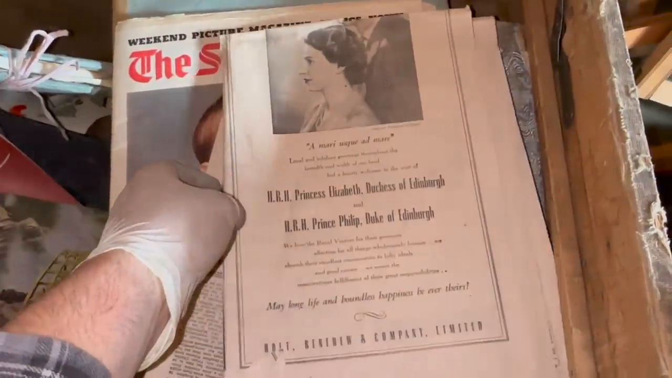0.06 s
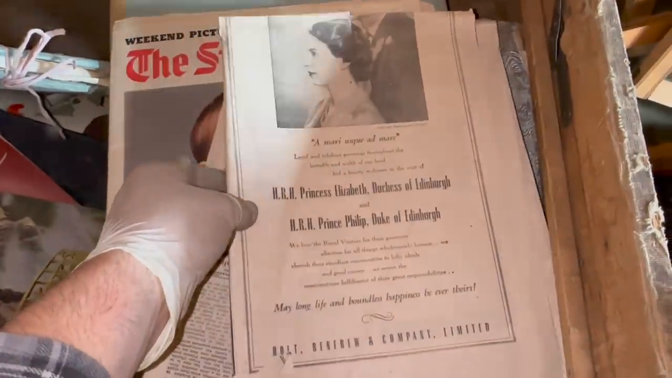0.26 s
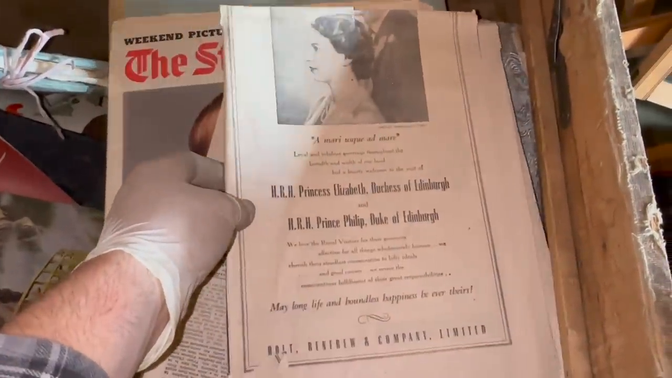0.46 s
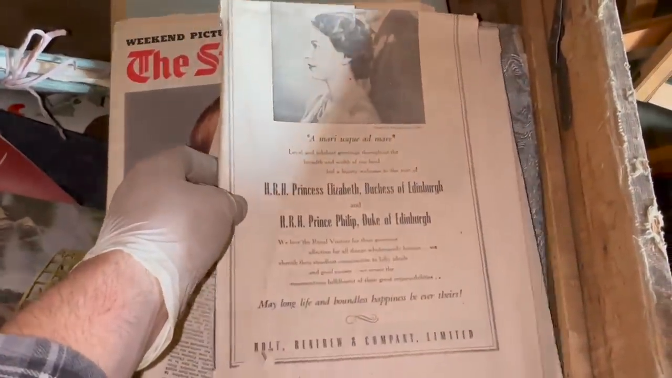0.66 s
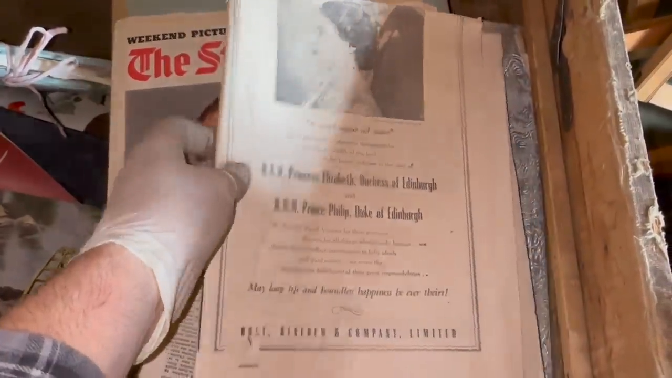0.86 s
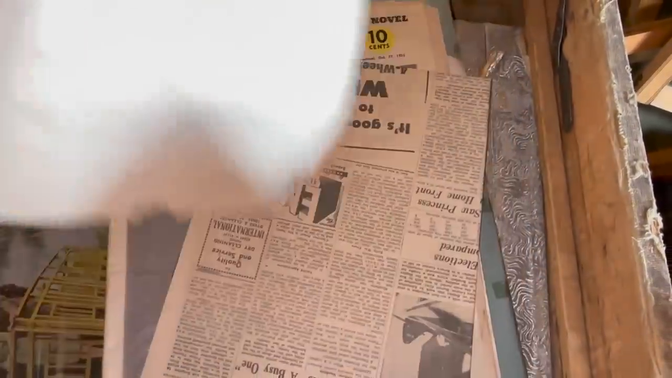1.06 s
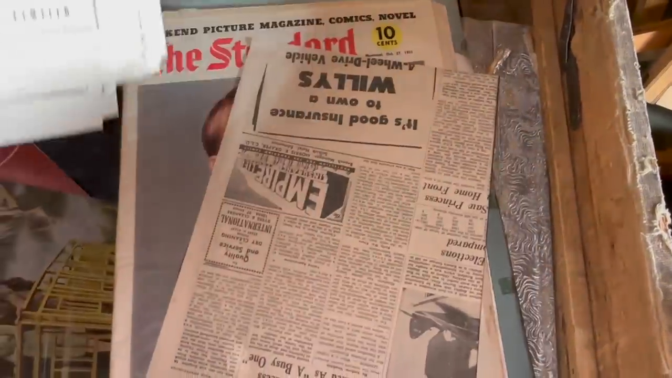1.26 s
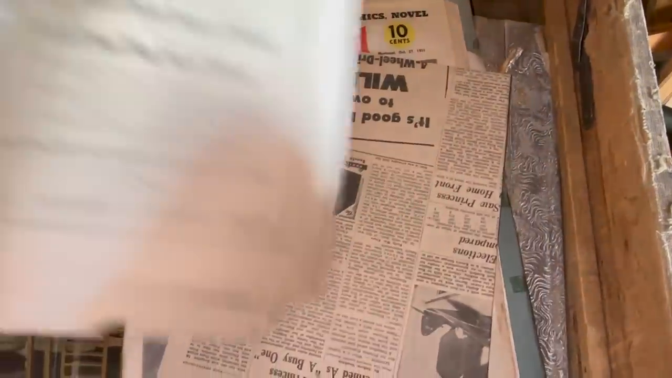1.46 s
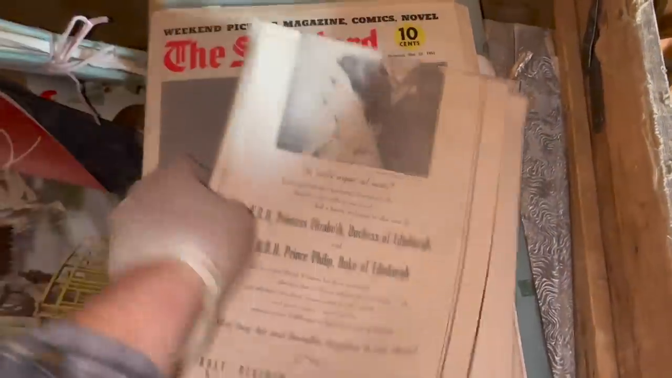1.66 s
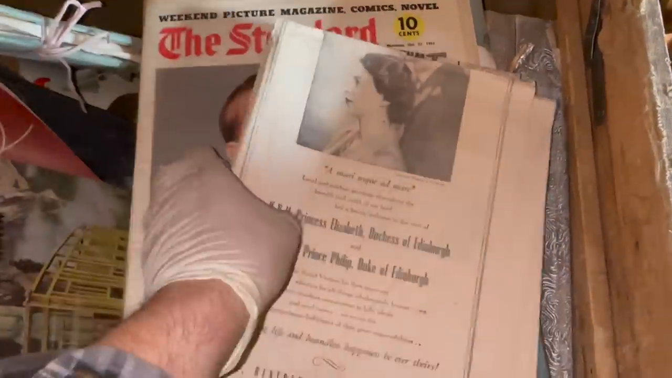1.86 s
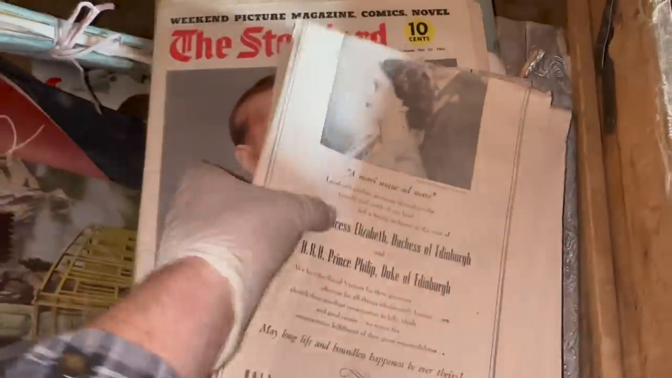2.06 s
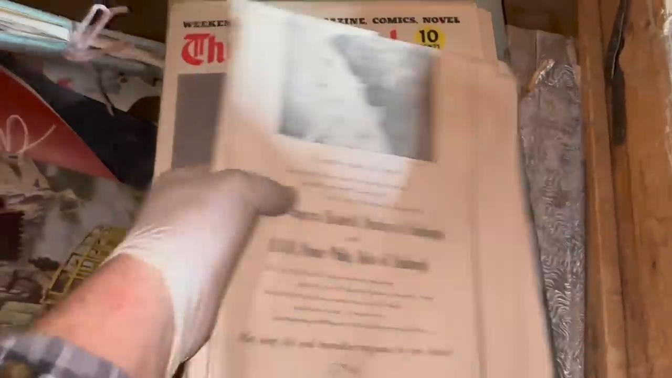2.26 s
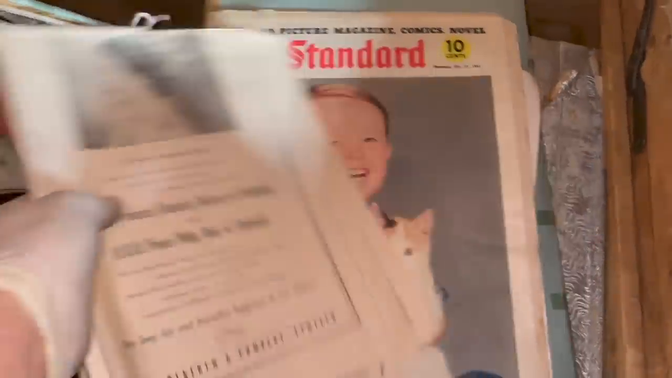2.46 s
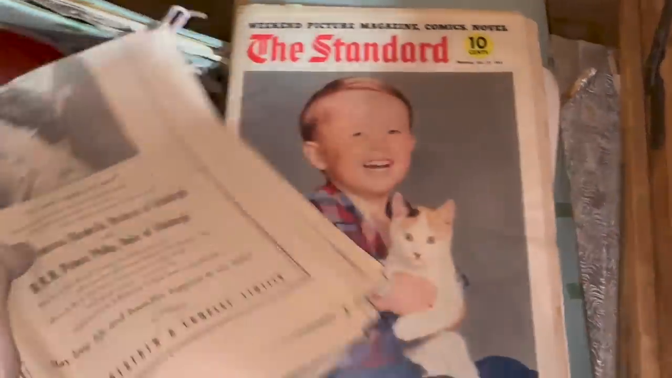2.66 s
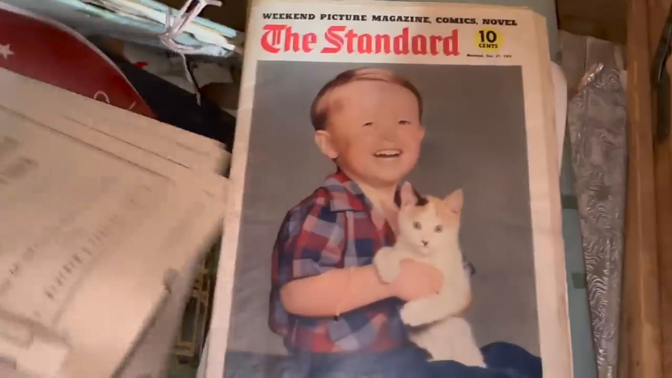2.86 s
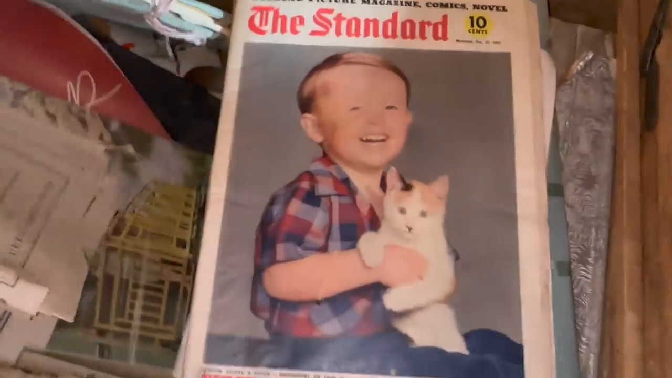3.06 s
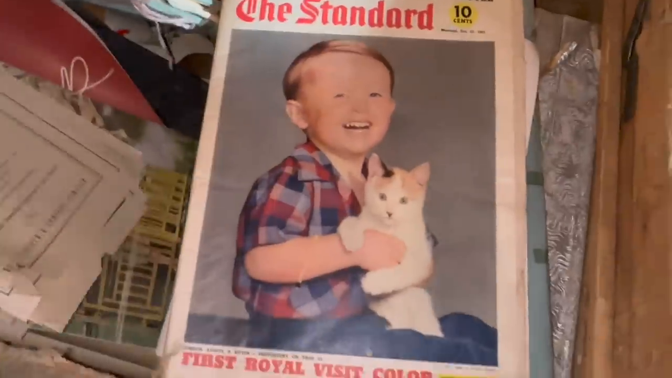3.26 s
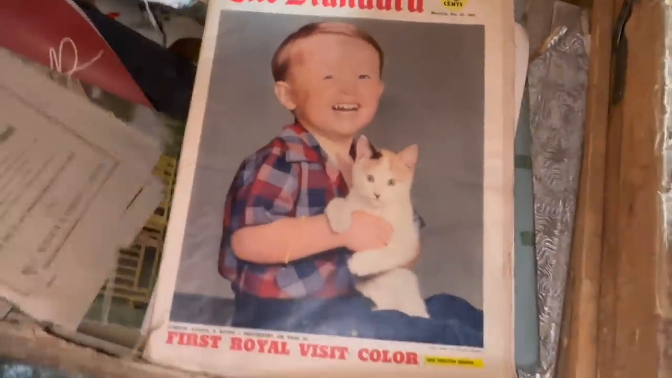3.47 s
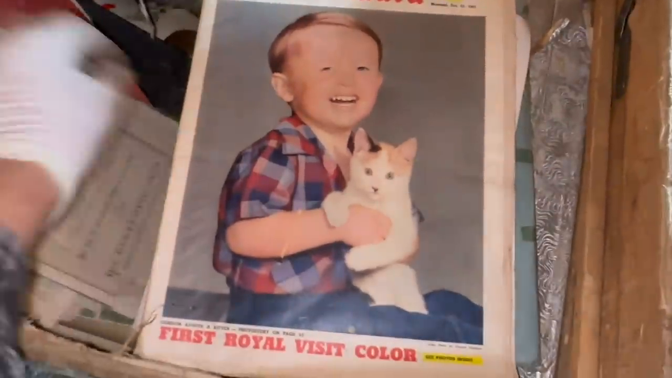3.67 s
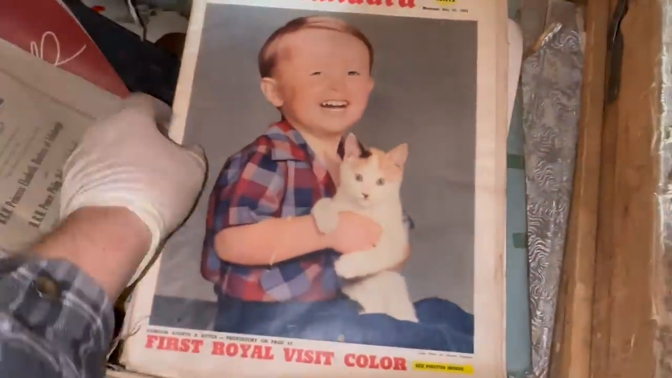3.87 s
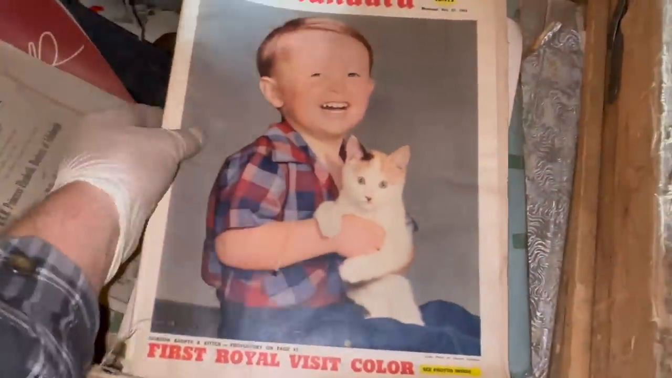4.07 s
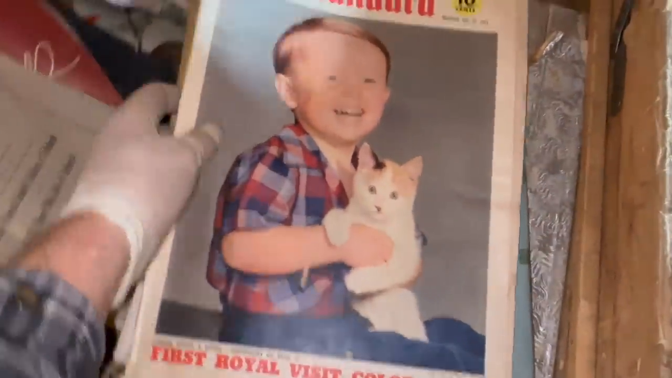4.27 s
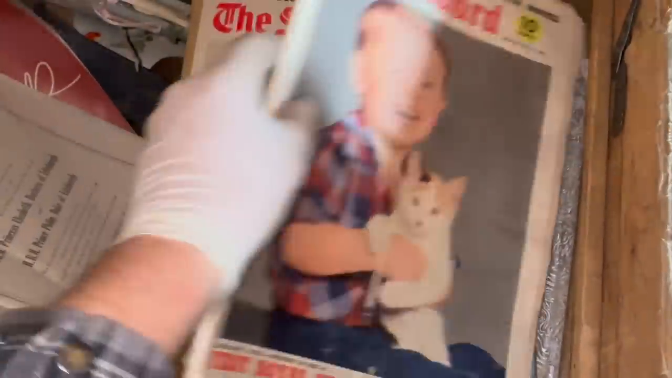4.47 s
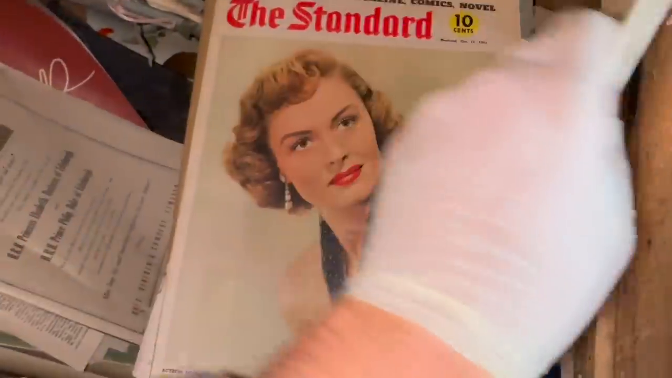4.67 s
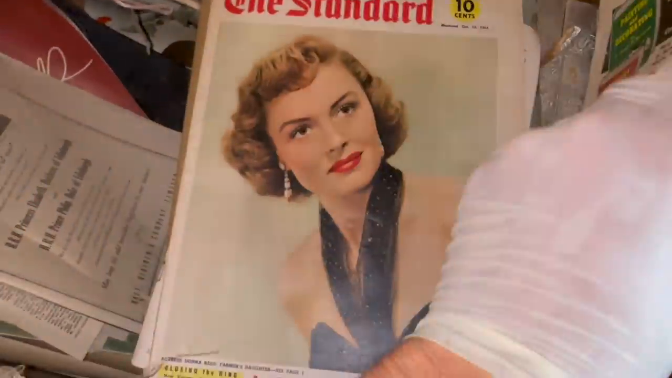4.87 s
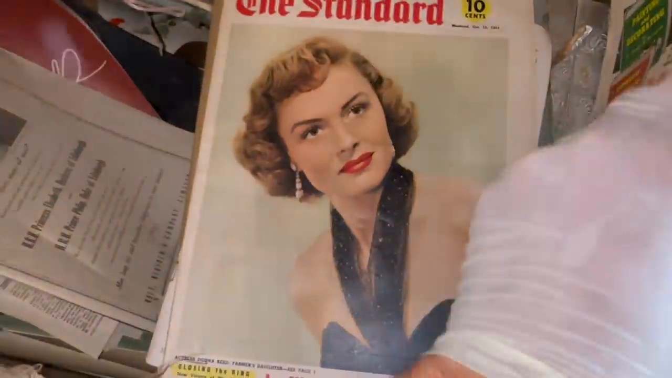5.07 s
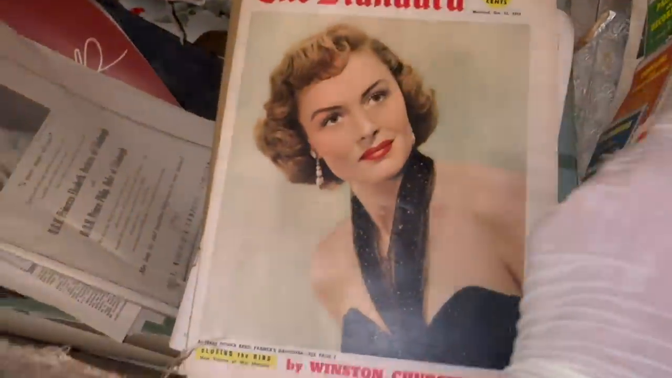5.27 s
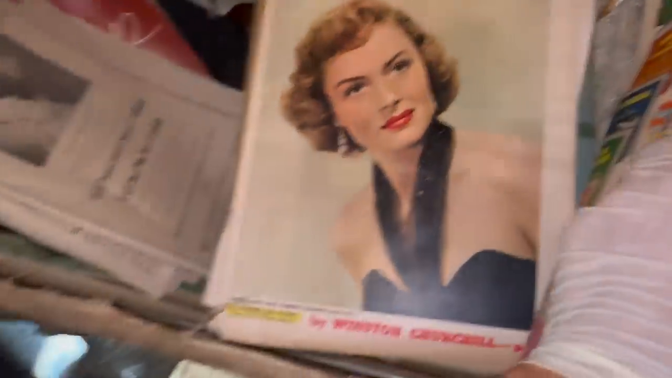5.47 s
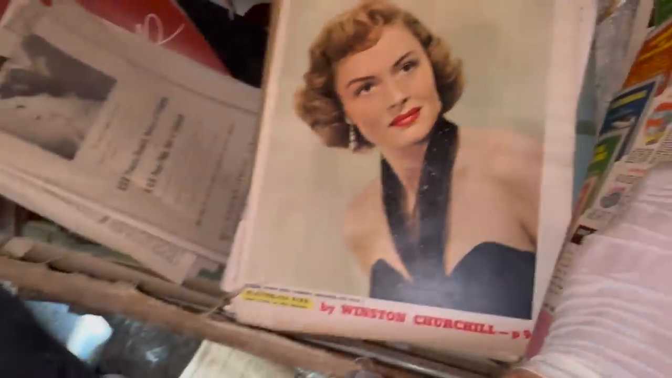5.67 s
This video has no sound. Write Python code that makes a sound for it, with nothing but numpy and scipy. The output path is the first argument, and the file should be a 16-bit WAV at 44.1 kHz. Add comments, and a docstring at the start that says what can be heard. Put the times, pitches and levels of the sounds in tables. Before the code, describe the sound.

A hand shuffles brittle newspaper and magazine pages over a wooden crate, heard very close with short, dry reflections. Sparse light crackles build into crunching folds and a strong papery swoosh, followed by a dull, sinking thump of the dropped pages. After a lull, fine crisp ticks thicken into a rapid crackling page turn with a faint wooden knock, then fade into low room rumble and soft hiss.

```python
"""A low rumble and a faint hiss open the scene in a quiet garage: filtered noise, swelling slowly.
Over them a gloved hand lifts, slides and drops old newspaper and magazine pages above a wooden crate.
Sheets hiss and crinkle (noise and small rings), creases snap and crunch (noise bursts through resonances),
knocks ring the crate (decaying modes), and the dropped stack booms (sines that sink in pitch).
Short echoes follow the buckling, and two microphone ports colour everything."""
import sys
import numpy as np
from scipy import signal
from scipy.fft import rfft, irfft, next_fast_len
from scipy.io import wavfile
from scipy.ndimage import map_coordinates

SR = 44100
rng = np.random.default_rng(int(sys.argv[2]) if len(sys.argv) > 2 else 0)


def persist_wave(psi):
    """Save psi, clipped to +-1, as 16-bit WAV."""
    counts = np.round(np.clip(psi, -1, 1) * 32767).astype(np.int16)
    wavfile.write(sys.argv[1], SR, np.atleast_2d(counts).T)


N = 252340  # samples


def amp(db):
    """Decibels to gain."""
    return 10 ** (np.asarray(db) / 20)


def rms_one(x):
    """Scaled to unit power."""
    return x / np.sqrt(np.mean(x ** 2) + 1e-20)


def in_time(rows):
    """Each column of a curve, sample by sample."""
    s, *columns = np.transpose(rows)
    return [np.interp(np.arange(N) / SR, s, c) for c in columns]


def at_hz(points, hz):
    """A spectrum read on a log-frequency axis."""
    point_hz, values = np.array(points).T
    return np.interp(np.log(hz), np.log(point_hz + 1), values)


def drift(corner_hz):
    """Slow random wander around zero with spread 1: noise through a two-pole lowpass."""
    # computed at every 40th sample, with the start-up of the filter dropped
    r = np.exp(-80 * np.pi * corner_hz / SR)
    noise = rng.standard_normal(N // 40 + 2002)
    slow = signal.lfilter([1], [1, -2 * r, r * r], noise)[2000:]
    return np.interp(np.arange(N) / 40, np.arange(len(slow)), rms_one(slow))


def band(order, edges_hz, x):
    """Bandpass filter."""
    return signal.sosfilt(signal.butter(order, edges_hz, "band", fs=SR, output="sos"), x)


def above(x, hz):
    """Highpass: thin paper radiates little bass."""
    return signal.sosfilt(signal.butter(2, hz, "high", fs=SR, output="sos"), x)


def coloured(x, spectrum):
    """Filtered by a spectrum, then set to unit power."""
    size = next_fast_len(N)
    hz = np.fft.rfftfreq(size, 1 / SR) + 1
    return rms_one(irfft(rfft(x, size) * amp(at_hz(spectrum, hz)), size)[..., :N])


def patchy(x, low_hz, patch_db, corner_hz, count):
    """Octave bands swell and sink independently, so the colour keeps shifting."""
    out = 0
    for k in range(count):
        edges = [low_hz * 2 ** k, min(low_hz * 2 ** (k + 1), .45 * SR)]
        out = out + amp(patch_db * drift(corner_hz)) * band(1, edges, x)
    return out


def ring(x, hz, t60):
    """A mode: a unit click sets a dying sine of starting height 1 ringing."""
    r, w = amp(-60 / (t60 * SR)), 2 * np.pi * hz / SR
    return signal.lfilter([0, np.sin(w)], [1, -2 * r * np.cos(w), r * r], x + 1e-18)


def grains(per_s, spread_db, clump_db, decay_s):
    """Envelope of small releases of uneven size, dying exponentially; a drifting rate can clump them."""
    sizes = amp(spread_db * np.minimum(rng.exponential(1, N), 3))
    starts = sizes * (rng.random(N) < per_s * amp(clump_db * drift(15)) / SR)
    return rms_one(signal.lfilter([1], [1, -np.exp(-1 / (decay_s * SR))], starts))


def wide(spread):
    """Stereo noise: a shared part plus separate left and right parts at 930-8800 Hz and above 14.5 kHz."""
    noise = rng.standard_normal((2, N))
    own = band(4, [930, 8800], noise)
    top = signal.sosfilt(signal.butter(6, 14500, "high", fs=SR, output="sos"), noise)
    return rng.standard_normal(N) + spread * (own * 1.09 + top * 0.48)


# how alike the background is at the two sides: (frequency [Hz], correlation [-1 to 1])
LIKENESS = [(60, 0.97), (180, 0.88), (550, -0.71), (1650, 0.027), (4970, -0.13), (8000, 1), (11000, 1)]


def diffuse(spectrum):
    """Stereo noise from all around: mid and side are mixed to a left-right likeness set by frequency."""
    size = next_fast_len(N)
    alike = np.clip(at_hz(LIKENESS, np.fft.rfftfreq(size, 1 / SR) + 1), -1, 1)
    mid, side = rfft(rng.standard_normal((2, size)))
    pair = np.sqrt(1 + alike) * mid + np.sqrt(1 - alike) * side * [[1], [-1]]
    return coloured(irfft(pair, size)[:, :N], spectrum)


# course of the low rumble: (time [s], level before the swells [dB])
RUMBLE_LEVEL = [(0, -51), (0.07, -43), (0.18, -56), (0.42, -53), (0.51, -51), (0.95, -53.5), (1.2, -47.5),
                (2.28, -51), (2.34, -52.5), (2.75, -47), (2.95, -53), (3.14, -46), (3.5, -44.5),
                (3.63, -55), (3.95, -63.5), (4.23, -66), (4.32, -44.5), (4.5, -58), (4.72, -49.5),
                (5.72, -53.5)]
# spectrum of the rumble: (frequency [Hz], level per Hz [dB, relative])
RUMBLE_COLOUR = [(12, -75), (20, -24), (46, -2), (70, 7.5), (88, -3.5), (108, -10.5), (265, -24.5),
                 (300, -49), (390, -35), (660, -120)]
RUMBLE_SWELL_DB, RUMBLE_SWELL_CORNER_HZ = 2, 2.9


def rumble():
    """Diffuse bass noise follows its level curve, with slow random swells on top."""
    level_db = in_time(RUMBLE_LEVEL)[0] + RUMBLE_SWELL_DB * drift(RUMBLE_SWELL_CORNER_HZ)
    return amp(level_db) * diffuse(RUMBLE_COLOUR)


# spectrum of the faint hiss before its bands swell: (frequency [Hz], level per Hz [dB, relative])
AIR_COLOUR = [(120, -54), (200, -5), (254, -11.5), (473, -9.5), (600, -26), (730, -5.5), (900, -5),
              (1300, -14.5), (2700, -33), (6050, -14), (7830, -20.5), (16000, -46)]
AIR_DB = -63  # rms


def air():
    """Faint diffuse noise whose octave bands swell gently."""
    return amp(AIR_DB) * rms_one(patchy(diffuse(AIR_COLOUR), 196, 2.8, 4.5, count=6))


# changing level of the drag while the hand moves the sheets: (time [s], sliding hiss [dB], flexing [dB])
DRAG = [(0, -58, -62), (0.22, -71, -68), (0.84, -62, -68.5), (1.1, -75, -68), (1.55, -61.5, -65),
        (1.8, -60, -61.5), (2.0, -51.5, -48), (2.35, -51, -56), (2.62, -39, -41.5), (2.82, -39, -47.5),
        (2.93, -52, -51.5), (3.15, -47, -48), (3.34, -52.5, -55.5), (3.7, -51, -53.5), (3.98, -80, -69.5),
        (4.4, -44.5, -62), (4.6, -63, -49), (4.8, -63, -56.5), (4.92, -87.5, -66), (5.55, -59, -63),
        (5.72, -59, -59)]
# a sheet slips along another: (start [s], rise [s], hold [s], sliding hiss [dB], flexing [dB])
SLIPS = [(0.523, 0.013, 0.063, -62, -63), (0.85, 0.029, .008, -59, -52),
         (0.882, 0.029, 0.038, -47.5, -53.5), (0.983, 0.0033, 0.012, -50.5, -64),
         (0.995, .01, 0.024, -56.5, -70), (1.576, 0.0059, 0.028, -43, -49),
         (1.615, 0.051, 0.012, -51, -41.5), (1.661, 0.021, 0.078, -49, -63),
         (1.876, 0.0058, 0.077, -49, -55.5), (2.114, 0.11, 0.039, -50.5, -47),
         (2.367, 0.015, 0.019, -47.5, -51), (2.5, 0.0085, 0.084, -34.5, -40.5),
         (2.693, 0.01, 0.045, -46, -40), (2.84, 0.021, 0.014, -33.5, -63), (3.373, 0.011, 0.21, -53, -51),
         (4.013, 0.02, 0.047, -50, -71), (4.107, 0.005, 0.033, -48.5, -66), (4.25, 0.012, 0.35, -55, -79),
         (4.712, 0.013, 0.014, -61, -64), (4.42, 0.016, 0.047, -56, -48), (4.485, 0.016, 0.086, -51, -44),
         (4.625, 0.02, 0.061, -53.5, -50.5), (4.753, 0.0077, 0.0057, -50.5, -40.5)]
SLIP_RISE_DB, SLIP_FADE_DB_PER_S = 12.5, 456


def handling():
    """Levels in dB of hiss and flexing: the powers of the drag and of slips that rise, hold and fade add up."""
    t, power = np.arange(N) / SR, amp(in_time(DRAG)) ** 2
    for s, rise_s, hold_s, *levels_db in SLIPS:
        top = s + max(rise_s, .002)
        rise_db = np.interp(t, [s, top], [-SLIP_RISE_DB, 0])
        fade_db = SLIP_FADE_DB_PER_S * np.maximum(t - top - hold_s, 0)
        power += (t >= s) * amp(np.add.outer(levels_db, rise_db - fade_db)) ** 2
    return 10 * np.log10(power)


# the hand: (time [s], lead of the left microphone [ms], crackle against hiss [dB],
#            extra treble added to the hiss [dB]); arrive() reads the lead
HAND = [(0, 0.037, -10, -35), (1.0, 0.068, -6.5, 7.5), (1.15, 0.49, -22, -3), (1.45, 0.18, -14, -29),
        (1.55, 0.035, -17, 0), (2.45, 0.016, -14, 4), (2.55, 0.17, -17, -14), (3.1, 0.24, -13, -26),
        (3.65, 0.22, -10, -13), (4.0, 0.21, 1.5, -3), (4.3, 0.071, -2.5, -1), (4.45, 0.05, -3.5, 4),
        (4.7, -0.079, -5, 4.5), (4.9, 0.06, -8, 15), (5.72, 0.13, -38, 2)]
# filter that colours the sliding hiss: (frequency [Hz], gain [dB, relative])
SLIDE_COLOUR = [(880, -68), (1500, -9), (2510, -7.5), (4500, -5), (5070, -7.5), (6430, -5.5), (7920, -5.5),
                (10200, -6.5), (12400, -18.5), (15500, -11.5), (16100, -42)]
TREBLE_HZ = 7800


def sliding(level_db):
    """Friction hiss of sheet on sheet with fibre crackle in it; its colour shifts as the contact wanders."""
    _, crackle_db, treble_db = in_time(HAND)
    noise = wide(1.0)
    flutter = amp(drift(72.0))
    crackle = amp(crackle_db) * grains(410, 3, clump_db=0.0, decay_s=0.0005)
    rub = noise * (flutter + crackle)
    hiss = amp(level_db) * coloured(patchy(rub, 1006, 3.2, 14.7, count=4), SLIDE_COLOUR)
    return hiss + amp(treble_db) * above(hiss, TREBLE_HZ)


# filter that colours the flexing: (frequency [Hz], gain [dB, relative])
FLEX_COLOUR = [(59, -10), (100, 5.5), (200, -4), (338, -2.5), (521, -15.5), (1470, -9.5), (2060, -14.5),
               (4000, -20.5), (5200, -20), (8800, -120)]


def flexing(level_db):
    """Duller crinkle of the bending sheets: soft buckles that die over tens of milliseconds shape noise."""
    bend = (0.5 + grains(90, 4.8, clump_db=2.0, decay_s=0.035)) * wide(1.0)
    return amp(level_db) * coloured(patchy(bend, 140.0, 3, 29.0, count=5), FLEX_COLOUR)


# typical rate, cycles rung within the t60, level against the flexing
CRINKLES_PER_S, CRINKLE_CYCLES, CRINKLE_DB = 420, 8, -4


def crinkles(level_db):
    """Small patches of the sheet pop at random and ring a few cycles, each at one of 14 pitches."""
    sizes = amp(3.5 * np.minimum(rng.exponential(1, N), 3)) * rng.choice([-1, 1], N)
    pops = sizes * (rng.random(N) < CRINKLES_PER_S * amp(3 * drift(12)) / SR)
    pitch = rng.integers(0, 14, N)
    sides = amp(np.outer([1, -1], rng.normal(0, 2.5, N)))  # each pop leans left or right
    rings = 0
    for k, hz in enumerate(np.geomspace(500, 6000, num=14)):
        rings = rings + ring(sides * pops * (pitch == k), hz, CRINKLE_CYCLES / hz) * hz ** -.3
    return amp(level_db + CRINKLE_DB) * rms_one(rings)


# creases buckling: (time [s], ring peak [dB], ring pitch [Hz], crisp edge against the ring [dB],
#                    bright crack against the ring [dB], t60 of the noise burst [s])
SNAPS = [(0.101, -45, 980, 3.5, -2, 0.019), (0.141, -36, 950, 5, -32, 0.015),
         (0.378, -50.5, 780, 5, -23, 0.004), (1.093, -50, 751, 1, -21, 0.014),
         (1.239, -35, 1700, 1.5, -35, 0.0057), (1.296, -47, 600, 7.5, -26, 0.015),
         (1.359, -47, 3700, -12, -9.5, 0.009), (1.388, -33.5, 1460, 2.5, -37, 0.0084),
         (1.436, -44, 3500, -8, -8, 0.0041), (1.467, -60, 1420, -20, -25, 0.012),
         (1.498, -39, 1450, -25, -28, 0.0098), (1.524, -47, 1450, 0, -25, 0.011),
         (1.666, -17, 2460, -5, -26, 0.0066), (1.708, -39.5, 1920, 2, 11, 0.015),
         (1.853, -42, 947, -4, -19, 0.0055), (1.885, -22, 1480, 1.5, -13, 0.012),
         (2.489, -14, 950, -28, -15, 0.0026), (2.559, -36, 923, -12, -20, .01),
         (2.591, -23.5, 1120, -14, -25, 0.011), (2.659, -18, 1300, -7, -25, 0.012),
         (2.706, -22.5, 1260, -1, 0, 0.016), (2.865, -36, 4100, -21, 1, 0.016),
         (3.154, -26, 1320, -26, -30, 0.015), (3.293, -24, 2150, 0.5, -36, 0.015),
         (3.482, -32, 870, -1, -22, 0.0064), (3.493, -29.5, 890, 1.5, -29, 0.015),
         (3.535, -26.5, 960, 2, -28, 0.011), (3.723, -36.5, 1250, 6, -11, 0.007),
         (3.755, -47.5, 1460, 14, -15, 0.015), (3.812, -46.5, 1260, 12, 9, 0.0089),
         (4.005, -48.5, 6700, -12, 6, 0.003), (4.029, -43.5, 2410, -7, 11, 0.0082),
         (4.113, -38, 2500, 3, 16, 0.0092), (4.122, -41, 5000, 7, 0, 0.0049),
         (4.132, -35, 2060, -2, 0, 0.0049), (4.1516, -29.5, 6100, -8.5, 4.5, 0.0077),
         (4.176, -46, 2420, 8, 12, 0.0049), (4.229, -48, 3930, -11, 16, 0.0075),
         (4.25, -30.5, 2500, 1, 7, 0.0073), (4.281, -40, 4370, 2, 11, 0.0082),
         (4.289, -37.5, 5000, 3, 11, 0.0044), (4.313, -38, 1740, -6, -7, 0.0115),
         (4.322, -41, 7000, -5, 3, 0.0054), (4.362, -33, 2240, -21, -11, 0.0084),
         (4.385, -37, 6440, 1, -8, 0.0049), (4.402, -37, 6000, 5, -2, 0.0073),
         (4.415, -31.5, 1480, -6, 0, 0.0029), (4.426, -26, 2800, 2.5, 3, 0.0176),
         (4.515, -35.5, 990, 11, 8.5, 0.017), (4.522, -33.5, 1020, -11, -4, 0.0054),
         (4.551, -32, 1780, -6, 1, 0.01), (4.556, -25, 1610, -2, -3, 0.0093),
         (4.563, -33.5, 1020, -11, 0, 0.012), (4.58, -40, 1300, -3.5, 11, 0.0089),
         (4.721, -41, 1937, -14, 11.5, 0.0097), (4.755, -44, 1720, 16, 3, 0.0052),
         (4.760, -22, 1690, -17, -17, 0.0081), (4.765, -36, 1510, -10, 8.5, 0.0087),
         (4.792, -42, 1500, -3, 11, 0.003), (4.851, -31.5, 1460, 7, 9.5, 0.0059),
         (4.934, -53.5, 861, 12, 2, 0.0078), (5.101, -34, 1990, -6, -25, 0.022),
         (5.387, -59, 3000, -8, 16, 0.0073)]
# first jolt against the noise after it, share of t60 spent building up, cycles of ring
SNAP_CLICK, SNAP_RISE, SNAP_CYCLES = 0.9, 0.07, 5


def snaps():
    """Each buckle is a jolt and a dying burst of noise: a broad ring of the sheet, a crisp edge and a bright crack.
    A longer buckle also takes longer to build up."""
    size = 3000
    out, t = np.zeros((2, N + size)), np.arange(size) / SR
    for s, peak_db, hz, edge_db, crack_db, t60 in SNAPS:
        t60 = np.clip(t60, .001, .1)
        shape = amp(-60 * t / t60) * np.minimum(t / (SNAP_RISE * t60), 1)
        burst = (rng.standard_normal(size) + 0.78 * rng.standard_normal((2, size))) * shape
        common = burst.mean(axis=0)
        jolt = common + 0.54 * burst
        jolt[:, round(SNAP_RISE * t60 * SR)] += SNAP_CLICK * np.sqrt(t60 * SR / 14)
        jolt = signal.sosfilt(signal.butter(1, min(3 * hz, 12000), fs=SR, output="sos"), jolt)
        body = above(ring(jolt, hz, min(SNAP_CYCLES / hz, 2 * t60)), 0.5 * hz)
        edge = band(1, [2100, 5000], burst)
        crack = band(2, [4000, 11500], common * amp(-30 * t / t60))  # dies faster than the rest
        at = round(s * SR)
        for part, part_db in [(body, 0), (edge, edge_db), (crack, crack_db)]:
            out[:, at:at + size] += amp(peak_db + part_db) * part / np.abs(part).max()
    return out[:, :N]


# the stack knocks the crate: (time [s], strength of the push [dB])
KNOCKS = [(0.103, -58.5), (4.431, -60.5), (4.529, -49)]
# modes of the crate's boards: (frequency [Hz], gain [dB], t60 [s])
CRATE_MODES = [(342, 18, 0.19), (420, -15, 0.11)]


def crate():
    """Soft knocks set the wooden boards ringing."""
    push = np.zeros(N)
    for s, push_db in KNOCKS:
        push[round(s * SR)] = amp(push_db)
    soft = np.convolve(push, np.hanning(60) / 30)[:N]
    return sum(amp(gain_db) * ring(soft, hz, t60) for hz, gain_db, t60 in CRATE_MODES)


# a fold gives way in a cluster of buckles: (start [s], rms before the hump [dB], centre [Hz], length [s])
CRUNCHES = [(0.88, -60, 420, 0.029), (0.915, -50, 378, 0.022), (1.587, -54, 884, 0.023),
            (1.635, -42, 1480, 0.059), (1.958, -39, 1610, 0.016), (1.958, -44.5, 1050, 0.087),
            (2.046, -42, 2960, 0.017), (2.092, -45.5, 1380, 0.022), (2.138, -40.5, 810, 0.071),
            (2.219, -38, 675, 0.074), (2.447, -44.5, 4800, 0.036), (2.586, -30, 420, 0.0062),
            (2.637, -39, 1250, 0.028), (2.742, -45, 398, 0.022), (2.773, -34.5, 597, 0.044),
            (2.792, -36.5, 1840, 0.02), (2.9, -35.5, 1320, 0.013), (2.922, -41, 1430, 0.03),
            (3.014, -35.5, 1290, 0.034), (3.097, -47, 850, 0.036), (3.245, -46, 288, 0.032),
            (3.291, -38.5, 432, 0.0097), (3.533, -57, 318, 0.018), (4.653, -47.5, 1110, 0.029),
            (4.674, -44, 1500, 0.013), (5.551, -55.5, 1700, 0.045), (5.564, -58.5, 560, 0.158),
            (5.676, -49, 139, 0.044)]


def crunches():
    """Lumpy noise under a hump, coloured by the broad ring of the fold."""
    out = np.zeros((2, N))
    lumpy = (0.82 + grains(440, 2.2, clump_db=2.0, decay_s=0.0024)) * wide(0.92)
    for s, level_db, hz, length_s in CRUNCHES:
        at, size = round(s * SR), round(length_s * SR)
        hump = np.sqrt(np.hanning(size))
        piece = above(ring(lumpy[:, at:at + size], hz, 3.9 / hz), 0.37 * hz)
        out[:, at:at + size] += amp(level_db) * rms_one(piece) * hump
    return out


# the stack is dropped and booms: (time [s], level of the fundamental before its envelope [dB],
#     pitch setting for the start [Hz], end pitch [Hz], rise constant [s], decay constant [s])
THUDS = [(3.176, -20.5, 124, 44.5, 0.014, 0.049), (3.238, -22, 138, 62, 0.011, 0.055),
         (3.373, -29.5, 70, 61.3, 0.0056, 0.08), (3.482, -37, 80, 62.3, .01, 0.039)]
THUD_LAG_S = 0.001


def thuds():
    """A boom that swells, sinks in pitch and dies; the left microphone gets it later."""
    out, lag = np.zeros(N), round(THUD_LAG_S * SR)
    for s, level_db, start_hz, end_hz, rise_s, length_s in THUDS:
        t = np.maximum(np.arange(N) / SR - s, 0)
        # the first instant lies 0.0235 / 0.0143 times the start-to-end gap above the end pitch
        turns = end_hz * t + (start_hz - end_hz) * 0.0235 * (1 - np.exp(-t / 0.0143))
        shape = (1 - np.exp(-(t / rise_s) ** 2)) * np.exp(-(t / length_s) ** 3)
        tone = np.sin(2 * np.pi * turns) + 0.36 * np.cos(4 * np.pi * turns)
        out -= amp(level_db) * shape * tone
    return np.array([np.roll(out, lag), out])


PAN_DB_PER_MS, LAG_TOP_HZ = 5.5, 7500


def arrive(pair):
    """The nearer microphone hears the sound louder and, below the treble, first."""
    lead_ms = in_time(HAND)[0]
    n, half = np.arange(N), lead_ms * SR / 2000  # half the lead, in samples
    pan_db = PAN_DB_PER_MS * lead_ms
    body = signal.sosfiltfilt(signal.butter(2, LAG_TOP_HZ, fs=SR, output="sos"), pair)
    left = map_coordinates(body[0], [n + half], order=1)
    right = map_coordinates(body[1], [n - half], order=1)
    return (np.array([left, right]) + pair - body) * amp([pan_db / 2, -pan_db / 2])


GARAGE_T60_S, WALL_CUT_HZ, ECHO_DB = 0.031, 8500, -8


def garage(x):
    """Early reflections off crate and walls: a short noise tail, different for each side."""
    t = np.arange(round(.3 * SR)) / SR
    tail = rng.standard_normal((2, len(t))) * amp(-60 * t / GARAGE_T60_S) * (t > .001)
    tail = band(3, [600, WALL_CUT_HZ], tail)
    tail = tail / np.sqrt(np.sum(tail ** 2) / 2)
    return amp(ECHO_DB) * signal.fftconvolve(x[None], tail, axes=1)[:, :N]


def scene():
    """Paper near the microphones, echoes of its buckling, the booms and the background."""
    slide_db, flex_db = handling()
    hiss = sliding(slide_db)
    buckling = crinkles(flex_db) + snaps() + crunches() + crate()
    paper = hiss + flexing(flex_db) + buckling
    background = rumble() + air()
    return arrive(paper) + garage(buckling.mean(axis=0)) + thuds() + background


# colour of the ports: (frequency [Hz], left port over right [dB])
PORTS = [(150, 0.7), (500, 1), (1000, 0.5), (2200, -3.5), (4000, 2.5), (12000, 0)]
# left-right phase offset in the treble: (frequency [Hz], lead of the left channel [radians])
TREBLE_PHASE = [(6300, 0), (7900, 2.8), (9300, 1.5), (10700, 0.1), (13300, 0), (14400, -1.3), (15800, -3)]
CUTOFF_HZ = 16700  # from here up at least 70 dB down


def record(dry):
    """The two ports colour the sound a little differently; the treble is offset in phase between the channels,
    and the top is cut steeply."""
    size = next_fast_len(N)
    hz = np.fft.rfftfreq(size, 1 / SR) + 1
    # each channel takes half of the difference
    left = amp(at_hz(PORTS, hz) / 2) * np.exp(.5j * at_hz(TREBLE_PHASE, hz))
    heard = irfft(rfft(dry, size) * np.array([left, 1 / left]), size)[:, :N]
    return signal.sosfilt(signal.cheby2(16, 70, CUTOFF_HZ, fs=SR, output="sos"), heard)


dry = scene()
out = record(dry)
persist_wave(out)
```